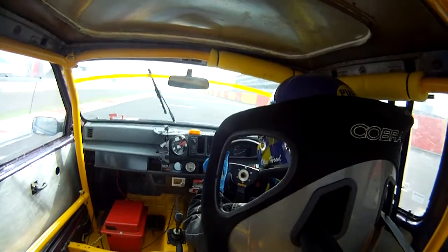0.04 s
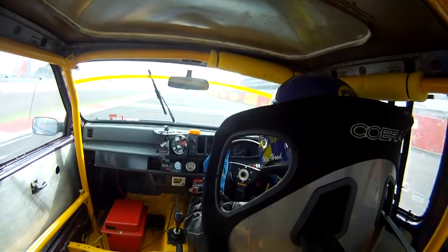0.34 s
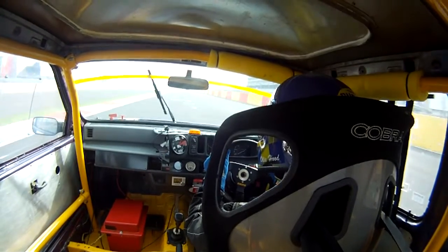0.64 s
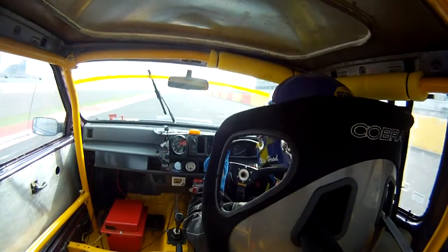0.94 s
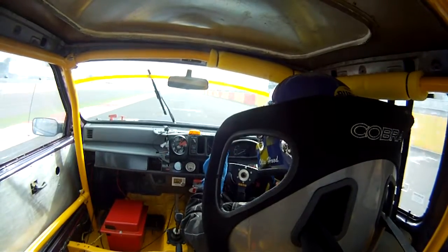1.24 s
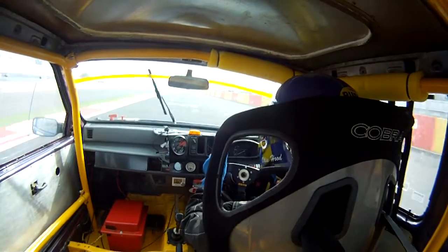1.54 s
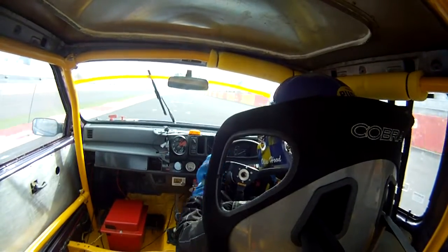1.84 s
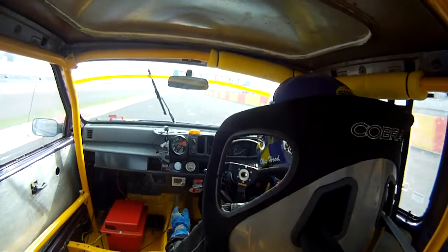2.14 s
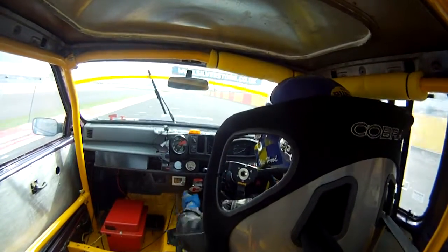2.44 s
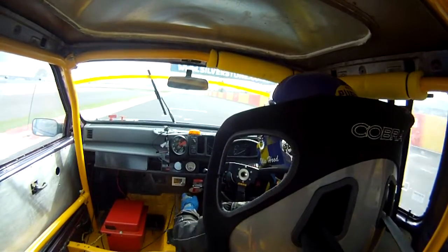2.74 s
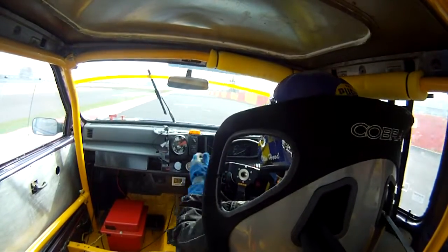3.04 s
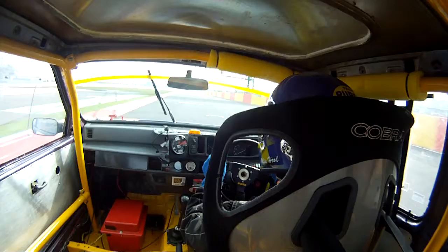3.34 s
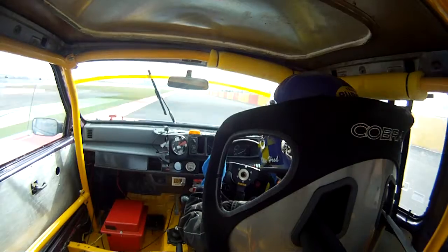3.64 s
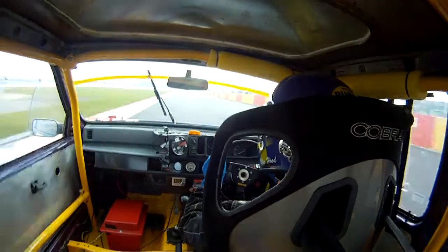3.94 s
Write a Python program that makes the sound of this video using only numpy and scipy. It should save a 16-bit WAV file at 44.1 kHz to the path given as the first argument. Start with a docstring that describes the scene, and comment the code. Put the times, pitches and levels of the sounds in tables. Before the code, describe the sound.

A loud racing engine drones at full throttle, heard inside the car, its pitch creeping upward with a rasp and mechanical rattle. At about 2.5 seconds the throttle lifts briefly, with an exhaust boom, a burble and the thud of an upshift. By 2.8 seconds the engine pulls again at a lower, nearly steady pitch until 4 seconds. Low road and wind roar runs underneath throughout.

```python
"""Inside a stripped four-cylinder race car at full throttle; the driver lifts and shifts up at 2.5 s.
The firing harmonics slide through the resonances of exhaust and cabin, and uneven cylinders add lines
between them. Valves and gears rattle once per cycle, combustion rasps, road and wind roar below.
A camera's gain control evens the level and its sample-and-hold adds a thin ring; one tick comes late."""
import sys
import numpy as np
from scipy import signal
from scipy.fft import rfft, irfft
from scipy.io import wavfile
from scipy.ndimage import map_coordinates

SR = 44100
rng = np.random.default_rng(int(sys.argv[2]) if len(sys.argv) > 2 else 0)


def put_to_file(sound):
    """Save the sound as 16-bit audio at rate SR, in the file named by the first command-line argument."""
    columns = np.atleast_2d(sound).T  # one column per channel
    safe = np.clip(columns, -1, 1)
    whole_steps = np.round(safe * 32767)
    wavfile.write(sys.argv[1], SR, whole_steps.astype(np.int16))


N = 176400
T = np.arange(N) / SR

# Engine speed. Each row: time in seconds, firing rate in Hz.
FIRING_RATE = [(0,198.3),(.5,200.7),(1,202.5),(2,206.9),(2.47,208.5),(2.535,196.5),(2.61,207),(2.65,199),(2.69,179),(2.73,166.5),(2.78,169),(3.38,169.3),(3.6,170.4),(4,171.2)]
# Throttle. Each row: time in seconds, gain of the engine tones in dB.
THROTTLE_GAIN = [(0,-0.5),(1.5,0),(2.45,-0.5),(2.475,-10),(2.5,-8),(2.52,-15.5),(2.555,-16),(2.58,-2.5),(2.63,1),(2.67,0.5),(2.735,-3),(2.76,-0.5),(4,0)]
# Exhaust boom on the overrun. Each row: time in seconds, gain of the fundamental in dB.
OVERRUN_GAIN = [(2.45,0),(2.48,8),(2.51,16),(2.555,23),(2.58,15),(2.6,4),(2.63,-8),(2.665,1),(2.695,5),(2.715,2),(2.735,-3),(2.76,0)]
# Burble off load. Each row: time in seconds, roughness from 0 to 1.
ROUGHNESS = [(2.45,0),(2.5,.7),(2.57,0.37),(2.63,0.1),(2.68,0.2),(2.74,0.5),(2.8,0.08)]
# Exhaust and cabin response. Each row: frequency in Hz, base level of a harmonic in dB.
RESONANCES = [(165,-19.5),(180,-15),(198,-23.5),(207,-28.5),(340,-28.5),(385,-21.5),(402,-13.5),(416,-13),(450,-25),(505,-17.5),(515,-15.5),(545,-24),(570,-16),(598,-25),(610,-30),(622,-35.5),(675,-28),(690,-25.5),(745,-45),(796,-30.5),(812,-40),(832,-47.5),(846,-37.5),(860,-29.5),(900,-36),(998,-45.5),(1012,-36),(1042,-41.5)]
# Engine lines. Each row: multiple of the firing rate, base level in dB before the shift, and after it.
ENGINE_ORDERS = [(0.75, -32, -49), (1.75, -34.5, -47), (2.25, -36, -51), (2.75, -30.5, -35.5),
                 (3.25, -36, -31), (3.75, -49, -42.5), (4.25, -43, -36), (4.5, -57.5, -60),
                 (4.75, -44, -45), (5.25, -58.5, -45), (5.5, -56, -61), (5.75, -51.5, -42),
                 (6.0, -48.5, -32.5), (6.25, -50, -62), (6.5, -59.5, -57), (6.75, -60, -52.5),
                 (7.0, -50, -40.5), (7.25, -56.5, -44.5), (7.75, -54.5, -52), (8.0, -59, -47),
                 (8.25, -59.5, -50.5), (8.75, -61, -56), (9.0, -58.5, -54.5), (9.25, -58.5, -52),
                 (9.5, -58.5, -59), (9.75, -50.5, -58.5), (10.0, -63, -54), (10.75, -53.5, -56.5),
                 (11.0, -63, -50.5), (11.25, -66.5, -51), (11.75, -59, -59), (12.0, -65, -51),
                 (12.25, -63.5, -61), (13.75, -60.5, -54), (14.25, -61.5, -50)]
# Envelopes of rattle with rasp, and of the road. Each row: time in seconds, gain in dB.
TREBLE_GAIN = [(0.04, -37.5), (0.34, -41.5), (1.81, -42), (2.51, -43), (2.61, -36), (2.63, -39),
               (2.82, -39), (3.12, -40.5), (3.55, -38.5), (3.93, -38.5), (3.96, -40)]
ROAD_GAIN = [(0,-21),(.8,-22.5),(1.7,-24.5),(2.44,-23.5),(2.56,-19.5),(2.7,-22.5),(3.1,-23),(4,-21)]
# Spectral shapes of the noises. Each row: frequency in Hz, relative spectral density in dB.
RATTLE_SPECTRUM = [(900,-11),(1300,-6.5),(1600,-3),(2000,-0.5),(2400,-2),(2900,-4),(3400,-17.5),(3800,-14.5),(4300,-27),(5800,-26)]
RASP_SPECTRUM = [(400,-0.5),(700,10.5),(950,5),(1200,3),(1450,-2.5),(2000,2),(2450,-5.5),(2950,-3),(3400,-13.5),(3800,-10.5),(4300,-26),(4700,-18.5),(5600,-36.5),(6000,-37)]
THUD_SPECTRUM = [(25,-21),(55,-8.5),(140,17),(260,-17),(600,-54.5)]
CLACK_SPECTRUM = [(2000,-11.5),(3300,-10.5),(3650,1.5),(3800,2),(3950,-4.5),(4300,-13),(5300,-5),(6000,-13)]
ROAD_SPECTRUM = [(8,-36),(18,-11.5),(27,-0.5),(40,-1),(65,2),(90,-7.5),(120,-7.5),(150,0),(220,-5),(280,-4),(400,-2.5),(520,-5.5),(650,-12.5),(850,-18.5),(1400,-48.5)]

FIRINGS_PER_CYCLE = 4


def exhaust(firing_hz, firings, throttle_db, waver_db=0.74, dulling_db=13, burble_hz=47):
    """Resonance: five harmonics swell as they cross exhaust and cabin modes; off load they burble."""
    roughness = in_time(ROUGHNESS)
    depth = 0.49 * roughness  # modulates both phase and amplitude
    out = 0
    for k in range(1, 6):
        db = at_hz(RESONANCES, k * firing_hz) + throttle_db + waver_db * drift(28)
        if k == 1:
            db += in_time(OVERRUN_GAIN)
        if k > 3:
            db -= dulling_db * roughness
        stumble = depth * drift(burble_hz) / (2 * np.pi)
        out += partial(k * firings + stumble, db) * (1 + depth * drift(burble_hz))
    return out


def uneven_cylinders(firings, throttle_db, shift_s=2.68, crossfade_s=.09, waver_db=2.0):
    """Periodicity: unequal firings give lines at multiples of the cycle rate, rebalanced by the shift."""
    shifted = np.clip((T - shift_s) / crossfade_s, 0, 1)
    fade_db = -1.6 * (T - shift_s / 2)
    load_db = throttle_db - 2.5 * in_time(ROUGHNESS)  # rough running weakens the lines
    out = partial(firings / FIRINGS_PER_CYCLE, load_db - 37.5)  # the shell shakes once per cycle
    for order, before_db, after_db in ENGINE_ORDERS:
        db = (1 - shifted) * (before_db + fade_db) + shifted * after_db
        out += partial(order * firings, db + load_db + waver_db * drift(3.8))
    return out


def valve_rattle(firings, count=320, gain_db=-5):
    """Periodic impacts: the same valve and gear contacts recur each cycle, giving a line spectrum."""
    accent = 1 + 0.2 * np.cos(2 * np.pi * FIRINGS_PER_CYCLE * np.arange(count) / count)
    contacts = accent * rng.standard_normal(count)
    position = (firings / FIRINGS_PER_CYCLE) % 1 * count
    impacts = map_coordinates(contacts, [position], order=3, mode="grid-wrap")
    return from_db(gain_db) * colour(impacts, RATTLE_SPECTRUM)


def combustion_rasp(firings, pulsing=0.19, gain_db=3.5):
    """Amplitude modulation: gas noise pulses with the firings and once per engine cycle."""
    angle = 2 * np.pi * firings
    pulses = (np.cos(angle) + np.cos(2 * angle)) / 2
    envelope = 1 + pulsing * pulses + 0.11 * np.cos(angle / FIRINGS_PER_CYCLE)
    return from_db(gain_db) * colour(rng.standard_normal(N) * envelope, RASP_SPECTRUM)


def gear_change(peak_s=2.568, width_s=.018, thud_db=-20, clack_db=-47.5):
    """Impact excitation: the engaging gear sends a thud through the floor, with a metallic clack."""
    swell = np.exp(-.5 * ((T - peak_s) / width_s) ** 2)
    return swell * (from_db(thud_db) * noise(THUD_SPECTRUM) + from_db(clack_db) * noise(CLACK_SPECTRUM))


def road_roar(waver_db=1.5):
    """Random forcing: tyres and wind shake the bare shell into a low roar."""
    return from_db(in_time(ROAD_GAIN) + waver_db * drift(7.3)) * noise(ROAD_SPECTRUM)


def gain_control(x, rest_db=-13, share=0.32, reaction_s=0.012):
    """Compression: the gain opposes a share of each swing in dB about the resting level."""
    pole = np.exp(-1 / (reaction_s * SR))
    rest_power = from_db(rest_db) ** 2
    power = rest_power + signal.lfilter([1 - pole], [1, -pole], x ** 2 - rest_power)
    return x * (power / rest_power) ** (-share / 2)


def sample_and_hold(x, hold_hz=12000, edge_hz=5700):
    """Spectral imaging: holding each sample mirrors the band about the hold rate, a thin ring."""
    narrow = signal.sosfilt(signal.ellip(8, .2, 60, edge_hz, fs=SR, output="sos"), x)
    samples = signal.resample(narrow, N * hold_hz // SR, axis=-1)
    return signal.resample(np.repeat(samples, 4, axis=-1), N, axis=-1)


def from_db(db):
    """Decibels to amplitude ratio."""
    return 10 ** (np.asarray(db) / 20)


def rms_one(x):
    """Normalisation to rms 1."""
    return x / np.sqrt(np.mean(x ** 2) + 1e-20)


def in_time(rows):
    """Linear interpolation of a curve at every sample."""
    return np.interp(T, *np.transpose(rows))


def at_hz(spectrum, hz):
    """Interpolation of a spectrum on a log-frequency axis."""
    knots_hz, db = np.transpose(spectrum)
    return np.interp(np.log(hz + 1e-9), np.log(knots_hz), db)


def colour(x, spectrum):
    """Filtering by spectral multiplication; rms 1."""
    gain = from_db(at_hz(spectrum, np.fft.rfftfreq(N, 1 / SR)))
    return rms_one(irfft(rfft(x) * gain, N))


def noise(spectrum):
    """Filtered white noise; rms 1."""
    return colour(rng.standard_normal(N), spectrum)


def drift(corner_hz, step=40):
    """Slow random fluctuation: low-passed noise of rms 1."""
    pole = np.exp(-2 * np.pi * corner_hz * step / SR)
    white = rng.standard_normal(N // step + 2002)
    slow = signal.lfilter([1], [1, -2 * pole, pole ** 2], white)[2000:]  # once the filter has settled
    return np.interp(np.arange(N) / step, np.arange(len(slow)), rms_one(slow))


def partial(periods, db):
    """A sinusoid of given rms level and random starting phase."""
    return np.sqrt(2) * from_db(db) * np.sin(2 * np.pi * (periods + rng.random()))


def scene():
    """Superposition: engine, gear change and road add, heard from behind the seat."""
    firing_hz, throttle_db = in_time(FIRING_RATE), in_time(THROTTLE_GAIN)
    firings = np.cumsum(firing_hz) / SR + 0.0047 * drift(34)  # phase in firings, with crank jitter
    tones = exhaust(firing_hz, firings, throttle_db) + uneven_cylinders(firings, throttle_db)
    treble = from_db(in_time(TREBLE_GAIN)) * (valve_rattle(firings) + combustion_rasp(firings))
    return (tones + treble + road_roar() + gear_change())[None]


def record(dry, tick_s=3.387, tick_db=-11, cutoff_hz=15200):
    """Band limiting: the compressed, held sound and a one-sample tick pass through a steep low-pass."""
    held = sample_and_hold(gain_control(dry))
    tick = from_db(tick_db) * (np.arange(N) == int(tick_s * SR))
    return signal.sosfilt(signal.ellip(12, .1, 80, cutoff_hz, fs=SR, output="sos"), held + tick)


dry = scene()
out = record(dry)
put_to_file(out)
```